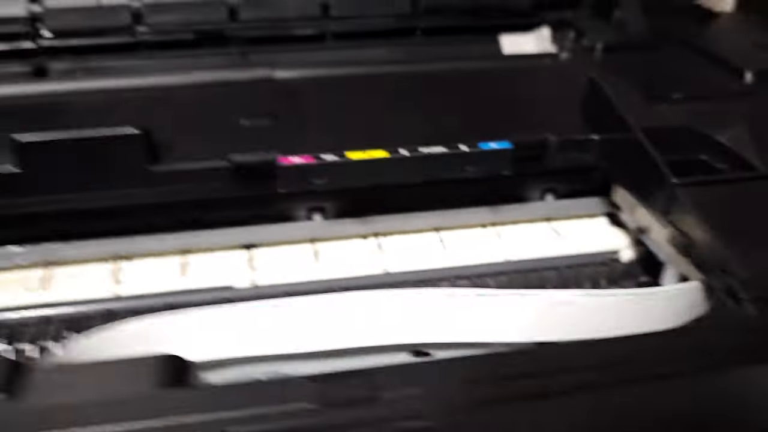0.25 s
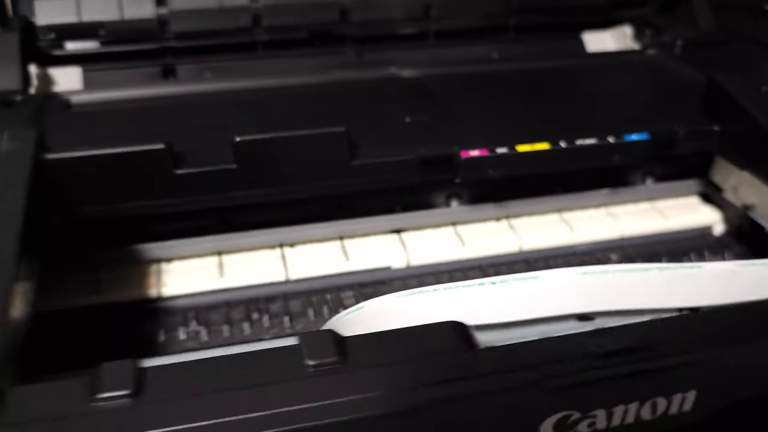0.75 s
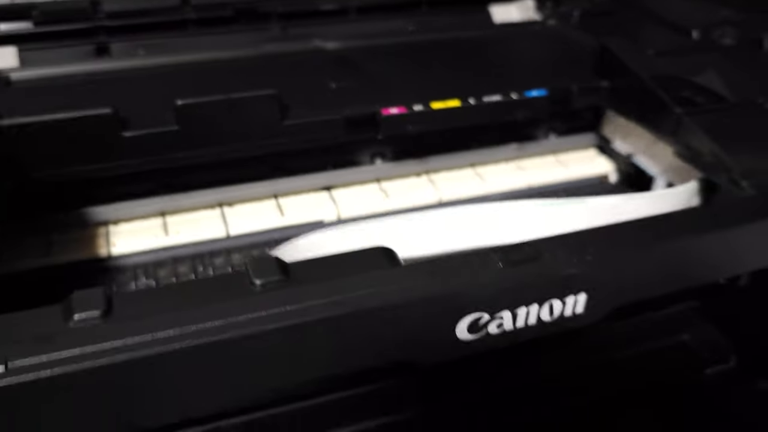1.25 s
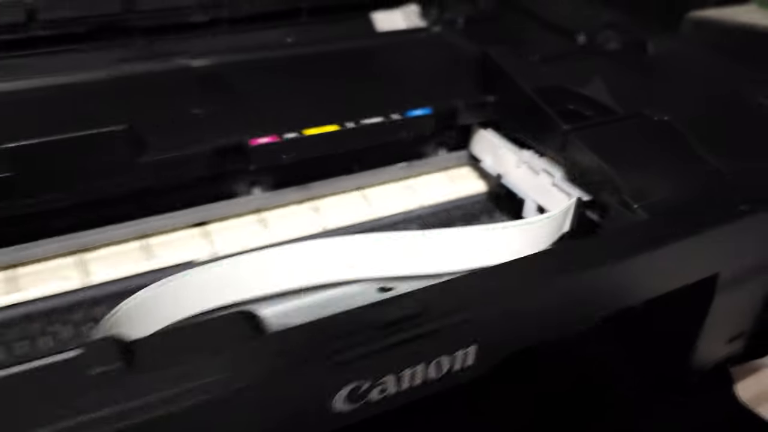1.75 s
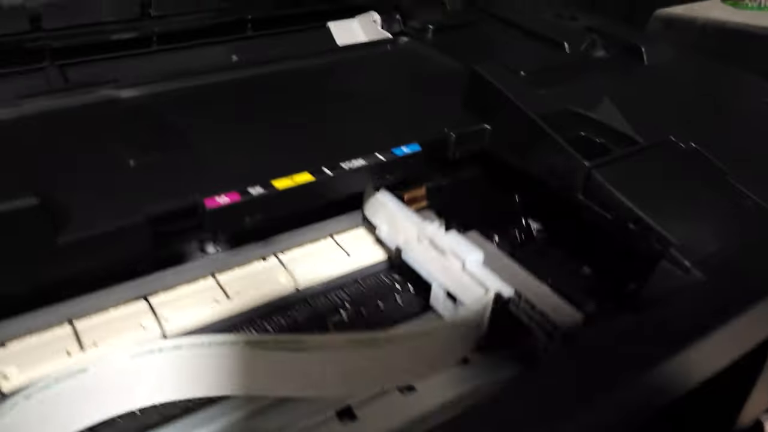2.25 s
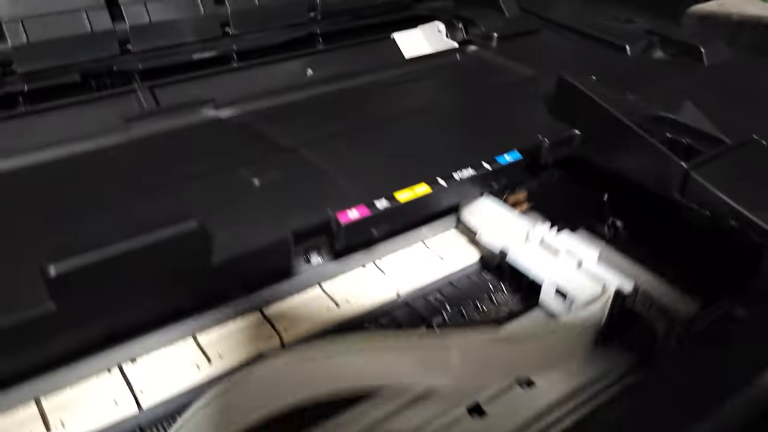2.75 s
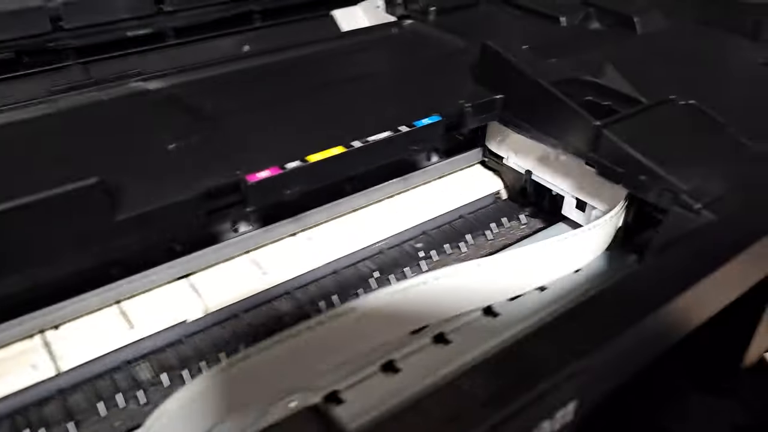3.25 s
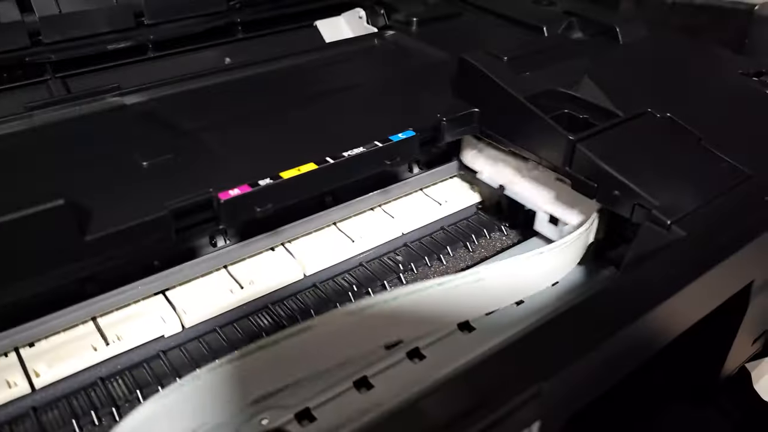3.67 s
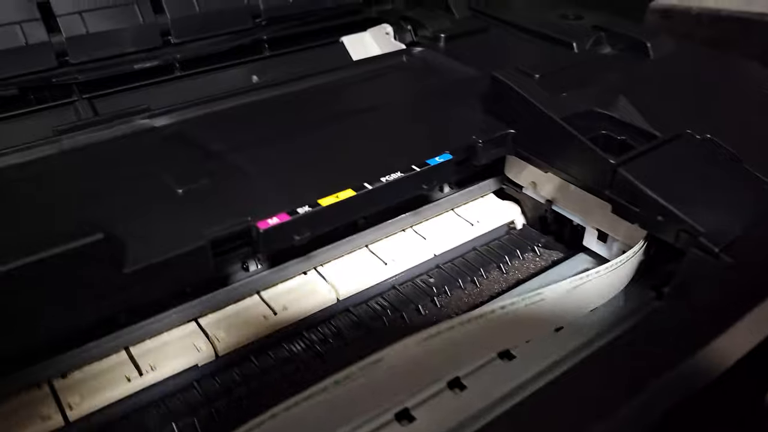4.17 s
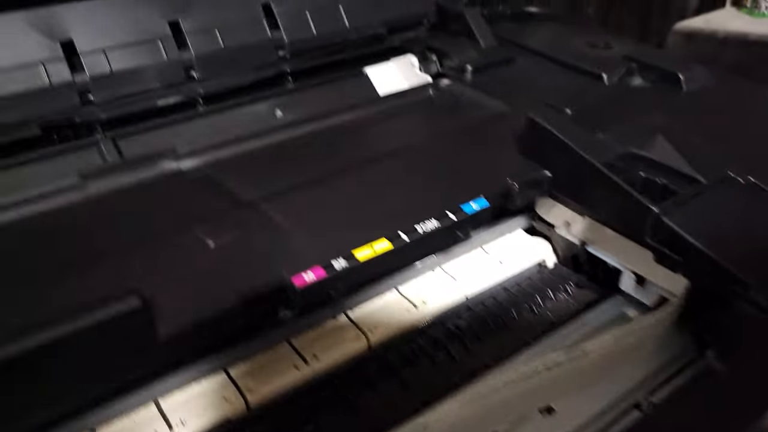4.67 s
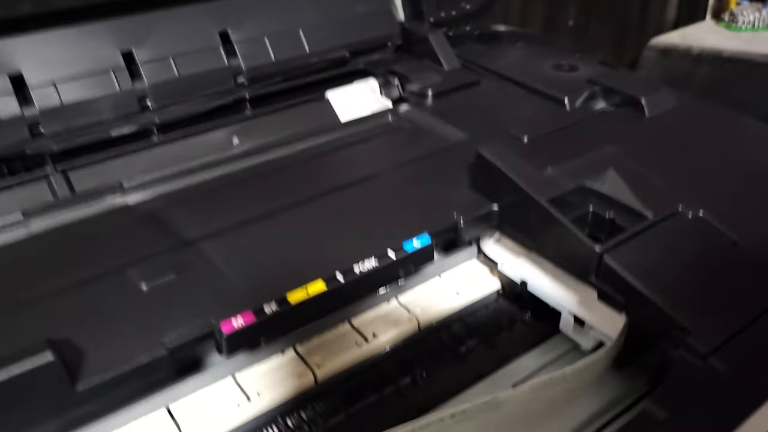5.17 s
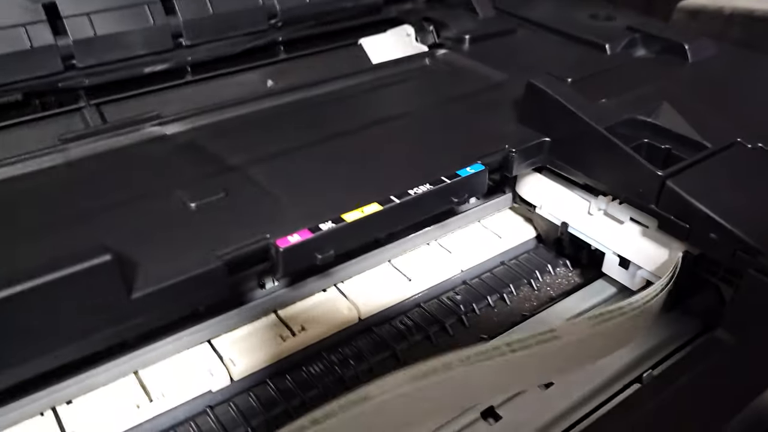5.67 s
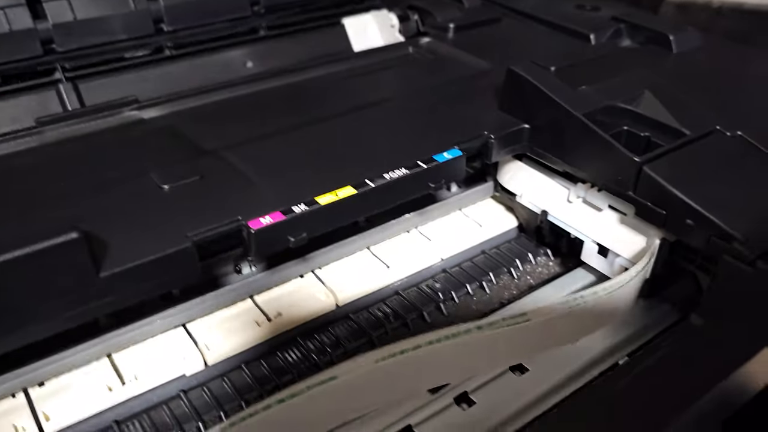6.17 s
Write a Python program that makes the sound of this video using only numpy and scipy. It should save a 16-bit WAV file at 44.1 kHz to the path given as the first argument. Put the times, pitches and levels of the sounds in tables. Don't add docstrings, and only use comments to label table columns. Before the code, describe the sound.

Close stereo view of an open inkjet printer in a small room. A low, rough motor hum and thin belt hiss run underneath. Plastic clicks and dull knocks come in uneven clusters, sparse at first, with a quieter stretch in the middle, then denser and louder. Latches tick, the cover rings briefly, and the carriage finally slams against its stop.

```python
import sys
import numpy as np
from scipy import signal
from scipy.fft import rfft, irfft, next_fast_len
from scipy.io import wavfile
from scipy.ndimage import uniform_filter1d, map_coordinates

SR = 44100
rng = np.random.default_rng(int(sys.argv[2]) if len(sys.argv) > 2 else 0)


def dump(signal):
    limited = np.clip(np.atleast_2d(signal).T, -1, 1)
    pcm = np.round(limited * 32767).astype(np.int16)
    wavfile.write(sys.argv[1], SR, pcm)


def gain_from_db(level_db):
    decades = np.asarray(level_db, float) / 20
    return 10 ** decades


N = 282284
TIME_S = np.arange(N) / SR

CLICKS = [(.2436, -35, -2.5, -4.5), (.338, -45, -10.5, -15), (.7147, -35, -12.5, -37),
          (1.271, -46.5, -3, -21), (1.366, -41.5, -14, -37), (1.4354, -52.5, -6, -40),
          (1.6347, -54.5, 5.5, -34), (1.6882, -43, 4.5, -17.5), (1.781, -50, 2, -16),
          (3.558, -46.5, -1, -11.5), (3.5933, -39.5, -3.5, -41), (3.801, -35.5, -3, -3),
          (3.8274, -39.5, -0.5, -7), (4.3253, -49, 7, -34), (5.2875, -46, 5, -18), (5.395, -47.5, -20, -3),
          (5.559, -66, -6, 10), (5.619, -54, 3, -16), (5.744, -59.5, 9.5, -2), (5.911, -57, -4, -8.5),
          (6.0705, -35.5, 0, -10), (6.0888, -46, 5.5, -28)]
TICKS = [(.1373, -45.5, 1.5, -24), (.8609, -57.5, 10.5, -9), (2.5371, -44.5, -7.5, -6),
         (2.578, -44.5, -10, -12), (3.641, -40.5, 4, -27), (3.6725, -52, 3, -19), (3.7018, -41.5, 3, -8),
         (4.1045, -24, -18, -19.5), (4.37, -33.5, -10, -35), (4.4224, -55.5, 5, -4.5),
         (4.9654, -50, -18, -18), (5.229, -39, 6.5, -28), (5.3776, -50.5, 1, -7), (5.4494, -53, 2, -10),
         (5.5114, -46.5, 4, 0), (5.586, -68, -6, 9), (5.84, -55, 14, -33), (6.1502, -27.5, 0.5, -6.5),
         (6.1664, -45.5, 6, 5), (5.497, -55, -1, -20), (5.535, -60, 1, -2), (6.2189, -32.5, -4, -18.5),
         (6.316, -50.5, -0.5, -23), (6.2155, -55, -10, 5)]
RATTLES = [(.1148, -53.5, 5, -5), (.2256, -36, -3.5, -2.5), (.261, -42, -13, -11), (.4315, -40, -2.5, -29),
           (1.4914, -38, -11.5, -37), (1.798, -46.5, -3, -7), (1.946, -47.5, -1, -25),
           (3.251, -48, 5.5, -17), (3.346, -33, -14, -8), (3.361, -38, -0.5, -7.5),
           (3.8486, -47.5, -18, -10), (4.8602, -44.5, -7.5, -22), (4.8828, -43.5, -2.5, -13.5),
           (4.918, -40.5, -0.5, -23.5), (5.9663, -58.5, 0, -12), (.29, -49, -15, -8),
           (6.176, -41.5, -8, -8), (6.26, -61, -5, -22)]
# [t/s, crack level/dB, shell knock re crack/dB, fizz re crack/dB, length/s]
SCRAPES = [(0.449, -42, -1.5, -14.5, 0.033), (0.553, -67, 14, -20, .012), (0.65, -52, -2, -28, 0.042),
           (0.683, -43, -0.5, -16, 0.015), (0.874, -68.5, 11.5, -6, 0.033), (1.188, -58, 5.5, -38, 0.028),
           (1.277, -50, -2, -16.5, 0.049), (1.541, -55, -4.5, -40, 0.032), (1.637, -66, 13, -25, 0.016),
           (3.323, -42.5, 4.5, -16, 0.039), (3.54, -44.5, -3, -20.5, 0.04), (3.71, -52, 2, -41, 0.029),
           (3.776, -45.5, 1.5, -19, 0.071), (3.999, -59.5, 2, -23, .039), (4.026, -51.5, -2.5, -32, 0.11),
           (4.109, -44.5, -1, -15.5, 0.03), (4.302, -49.5, -1, -43, 0.015), (4.34, -45, 2.5, -23, 0.019),
           (5.011, -61, 6.5, -29, 0.04), (5.109, -44.5, -1.5, -46, 0.021), (5.293, -62, -8, 1, 0.025),
           (6.223, -45, -12, -28, 0.02)]
# [f/Hz, width/Hz, level/dB]
LEVER_MODES = [(1470, 360, -4.5), (1850, 377, 2), (2140, 430, 1.5), (3260, 800, -4.5)]
# [f/Hz, width/Hz, level/dB]
CATCH_MODES = [(3520, 780, -5), (4200, 500, 0), (5050, 920, -2)]
# [f/Hz, width/Hz, level/dB]
SHELL_MODES = [(469.5, 64, -3.5), (541.4, 42, -2), (614, 52, -2), (725, 74, -2.5), (938, 133, -8),
               (1055, 82, -5), (1383, 183, -7.5)]
# [f/Hz, level/dB per Hz]
FIZZ_SPECTRUM = [(4500, -37), (6000, -1.5), (7400, 1.5), (8500, -5.5), (10200, -9.5), (12000, -12),
                 (15800, -15.5)]

# [t/s, peak level/dB, f/Hz]
THUDS = [(.139, -28, 157), (.228, -32, 150), (.856, -43, 128), (.888, -44, 174), (.99, -50.5, 169),
         (1.29, -40, 150), (1.788, -43, 102), (1.871, -40, 141.4), (2.541, -39, 194), (2.58, -42.5, 121),
         (3.259, -27.5, 165), (3.396, -47, 148), (3.55, -28.5, 126), (3.7, -38, 99.6), (3.858, -38, 150),
         (4.872, -27.5, 139), (4.918, -37.5, 165), (5.035, -47, 150), (5.291, -40, 151), (5.424, -40, 126),
         (5.458, -39, 139), (5.647, -40.5, 116), (5.76, -46, 150), (6.075, -36.5, 104), (6.148, -24.5, 104),
         (6.185, -37, 91), (6.31, -38.5, 93), (6.376, -31, 95)]
# [t/s, peak level/dB, f/Hz]
BUMPS = [(.224, -27, 305), (.244, -33.5, 265.4), (0.864, -41, 249), (1.284, -35, 289.7),
         (0.713, -49.5, 198), (1.2, -48.5, 205), (1.687, -38, 330.4), (3.15, -50, 232), (4.69, -44, 203.6),
         (4.76, -48, 215), (3.347, -20.5, 300), (3.639, -34, 315.3), (3.708, -32, 322), (3.805, -21.5, 298),
         (4.008, -41, 260), (4.099, -42, 293), (1.515, -52.5, 332), (3.265, -36, 380.4), (4.42, -33, 226),
         (4.21, -46, 270), (4.557, -45.5, 305), (5.23, -34, 362), (5.371, -40.5, 295), (5.511, -46, 367),
         (5.746, -30, 260), (5.841, -43, 280), (6.01, -35, 239.5), (6.068, -33.5, 294), (6.225, -38, 303.4),
         (6.24, -39.5, 300), (5.31, -46, 247), (6.361, -42, 347)]
# [f/Hz, width/Hz, level/dB]
FRAME_MODES = [(107.7, 33, -5), (150, 50, -0.5), (240, 51, -1.5), (304.7, 22, 1.5), (376, 142, -6)]

# [t/s, ring level/dB, crack level/dB, crack t60/s]
SLAM = [
    (6.3573, -29.5, -40, 0.076),
    (6.363, -17.5, -14, 0.06),
    (6.37, -26, -22, 0.06),
]
# [f/Hz, level/dB, t60/s]
STOP_MODES = [(544, 0, 0.055), (687, -2.5, .06), (913, 5.5, 0.035), (1090, 8.5, 0.05), (1289, 4.5, 0.05),
              (1837, 0, 0.055), (2185, 4.5, 0.054), (2700, -8, 0.04), (3200, -8, 0.07)]

# [t/s, peak level/dB, f/Hz]
PINGS = [(.454, -39.5, 544), (.478, -42, 537), (1.492, -37.5, 1450), (1.687, -40.5, 520),
         (3.255, -39.5, 718), (3.645, -29.5, 690), (3.712, -37, 647), (1.692, -36, 700),
         (4.327, -35.5, 726), (4.347, -37, 656), (5.23, -25.5, 602), (5.234, -25, 601.4), (5.746, -43, 400),
         (6.155, -34, 600), (4.13, -46, 640), (5.288, -31.5, 696), (5.746, -41, 625), (6.149, -23, 888)]
# [t/s, peak level/dB, f/Hz]
TAPS = [(0.142, -39, 590), (0.224, -36, 433), (0.574, -58, 510), (0.688, -37.5, 612), (0.861, -44, 436),
        (1.27, -45, 526), (1.288, -39, 443), (1.789, -42, 450), (2.55, -36, 550), (3.347, -31, 382),
        (3.558, -33, 455), (3.711, -38, 519), (3.805, -31, 389), (4.033, -38, 582), (4.106, -32, 697),
        (4.876, -32.5, 480), (4.917, -35, 770), (5.511, -42, 376), (5.841, -34, 600), (6.014, -42, 384),
        (6.074, -33, 428), (6.219, -35, 568)]
# [t/s, peak level/dB, f/Hz]
TINKS = [(0.2244, -39, 2220), (0.4304, -45, 1046), (0.7168, -31, 2320), (.722, -37, 1900),
         (1.497, -40, 2050), (1.372, -42, 2100), (1.3674, -37, 1420), (1.49, -32, 1380), (1.689, -39, 1470),
         (1.945, -47, 1090), (3.342, -38, 1420), (3.5942, -43, 2010), (3.8043, -33, 1380),
         (4.1066, -30, 1420), (4.3725, -37, 2310), (4.8614, -56, 1040), (4.9182, -34, 1110),
         (5.109, -44, 1360), (5.23, -28, 1045), (5.3951, -49, 1920), (5.5118, -37, 1260),
         (5.5116, -38, 1700), (5.842, -44, 1000), (6.0735, -39, 1080), (6.1507, -38, 1060),
         (6.2203, -25.5, 1067)]
# [t/s, peak level/dB, f/Hz]
CHINKS = [(0.2247, -30, 4250), (0.244, -23, 4900), (0.7143, -37, 2690), (.72, -38, 4000),
          (1.492, -41, 4200), (1.37, -43.5, 4300), (1.8, -44, 5200), (1.3668, -43, 3020),
          (1.493, -40, 2770), (1.781, -44, 3550), (2.5395, -40, 3940), (2.579, -47, 3350),
          (3.345, -31, 2980), (3.5954, -29.5, 3000), (3.6996, -42, 3330), (3.803, -31, 3000),
          (4.1067, -22, 3200), (4.371, -35, 2750), (4.8609, -45, 3360), (4.918, -37.5, 3840),
          (5.229, -41, 2900), (5.3767, -41, 3570), (5.3955, -39, 3940), (5.5109, -50, 5160),
          (6.073, -29, 2710), (6.1502, -24, 3860), (6.1654, -23.5, 4860)]

# [t/s, chassis hum level/dB]
LOAD = [(0, -54), (.46, -53.5), (.56, -61.5), (1.19, -57.5), (1.34, -52.5), (1.55, -69.5), (1.77, -47.5),
        (1.96, -56.5), (2.46, -58.5), (3.22, -57), (3.99, -60.5), (4.26, -61.5), (4.42, -52), (4.76, -55),
        (5.2, -61.5), (5.36, -54), (5.62, -54), (6.4, -51)]
# [t/s, belt hiss level/dB]
TRAVEL = [(0, -58.5), (.34, -55.5), (.46, -58.5), (.51, -74.5), (.75, -69), (1.64, -72.5), (1.72, -66),
          (2.25, -62), (3.24, -63), (3.44, -78), (3.62, -64), (3.85, -66), (3.99, -77), (4.54, -68.5),
          (5.24, -72), (5.31, -62), (5.56, -71.5), (6.4, -64.5)]
# [t/s, whirr gain/dB]
MESH = [(0, 3), (.6, 0), (4.35, -3.5), (4.5, -6.5), (4.9, -4), (5.6, 4.5), (6.4, 4.5)]
# [t/s, air gain/dB]
DRAUGHT = [(0, -2.5), (.2, -3), (.3, 3), (.5, 1), (1.7, 0), (2.3, 2.5), (3.3, -0.5), (4.2, -1.5),
           (4.6, -1.5), (5.3, -3.5), (5.7, -2), (6.4, -5)]
# [f/Hz, width/Hz, level/dB]
CHASSIS_MODES = [(89.3, 7.7, -3.5), (126, 15, 0), (192.8, 18, -0.5), (249, 16.7, -1.5), (300, 18.8, 0),
                 (362, 42, -9.5)]
# [f/Hz, width/Hz, level/dB]
GEAR_MODES = [(444, 13, 1), (553.3, 28.6, 0.5), (682, 40, -9.5), (805, 66, -9), (1070, 86, -8),
              (1560, 900, -14.5), (2100, 100, -11.5)]
# [f/Hz, level/dB per Hz]
BELT_SPECTRUM = [(880, -7), (1500, -7), (2000, -5.5), (2500, -9), (4020, -3.5), (6000, -9.5), (7800, -25),
                 (13200, -120)]
# [f/Hz, level/dB per Hz]
AIR_SPECTRUM = [(3530, -11.5), (6000, -9), (7370, -4), (9540, -10.5), (10600, -16.5), (12500, -9),
                (14000, -16), (15700, -13)]

# [t/s, length/s, level/dB]
WHINES = [
    (3.39, 0.15, -69),
    (3.863, 0.146, -68),
]
# [f/Hz, width/Hz, level/dB]
WINDING_MODES = [(4590, 340, 0), (12400, 350, -2), (13100, 300, -2), (14000, 300, -1), (14400, 500, -3)]

# [t/s, length/s, start f/Hz, end f/Hz, level/dB]
RUBS = [(0, 0.064, 3900, 4110, -50), (4.694, 0.1, 2000, 1940, -66), (.0, 0.24, 11700, 11900, -61.5),
        (.24, 0.21, 12300, 12100, -56), (.32, .04, 7400, 7400, -62), (0.368, 0.055, 8000, 7940, -64),
        (.455, .04, 7300, 7240, -58)]
# [t/s, length/s, start f/Hz, end f/Hz, level/dB]
CHIRPS = [(4.73, 0.051, 1960, 1410, -72), (4.785, 0.039, 1850, 1540, -79), (4.97, .175, 3920, 4200, -72),
          (5.135, .04, 4200, 3830, -70), (5.662, 0.045, 1050, 1070, -73), (5.712, 0.031, 1070, 1050, -65),
          (5.914, 0.048, 1070, 1070, -70.5)]
# [t/s, length/s, start f/Hz, end f/Hz, level/dB]
DRONES = [(3.86, .13, 312, 340, -69.5), (4.03, 0.115, 340, 310, -70), (4.14, .04, 262, 250, -60),
          (3.8, 0.043, 250, 254, -59), (4.6, 0.053, 560, 555, -78), (3.4, 0.128, 360, 305, -70.5)]

# [f/Hz, t60/s]
ROOM_T60 = [(150, 0.28), (1000, 0.17), (8000, 0.2)]
# [t/s, rumble level/dB]
SWAY = [(0.0, -72), (0.28, -52), (0.39, -78), (1.25, -69), (1.3, -59), (1.62, -80), (1.8, -58), (2.25, -78),
        (2.33, -62.5), (3.19, -82), (3.23, -69), (3.89, -64), (3.96, -79), (5.04, -66), (5.08, -79),
        (5.79, -69), (5.83, -81), (6.4, -69)]
# [f/Hz, level/dB per Hz]
RUMBLE_SPECTRUM = [(20, -32), (50, 12), (70, -3), (120, -44), (200, -120)]
# [f/Hz, left-right likeness]
LIKENESS = [(100, 0.99), (300, 0.92), (650, 0.79), (1000, 0.16), (1500, 0.0044)]
# [f/Hz, left minus right/dB]
LEFT_BALANCE = [(60, 0), (300, 2), (600, 2.2), (1000, 0.5), (2000, -1), (4000, 1), (8000, 1.5), (12000, 1)]


def clicks():
    s, db, knock_db, fizz_db, hold_s = np.transpose(SCRAPES)
    soft = contacts(s, db - 2.0, knock_db + 2.0, fizz_db + 4.0, t60_s=0 * s + 0.096,
                    snap_db=0.47 * fizz_db + 5.5, hold_s=hold_s, rise_s=0.0082, tick_db=-32)

    kinds = [(TICKS, 0.044), (CLICKS, 0.093), (RATTLES, 0.14)]
    rows = [(*row, t60_s) for table, t60_s in kinds for row in table]
    s, db, knock_db, fizz_db, t60_s = np.transpose(rows)
    snap_db = 5 + 0.57 * fizz_db
    hard = contacts(s, db, knock_db, fizz_db, t60_s, snap_db,
                    hold_s=0 * s + 0.0046, rise_s=0.00053, tick_db=-4.5)

    uneven_db = 3.1 * np.array([wobble(250), wobble(280), wobble(300), 0.38 * wobble(150)])
    crack, snap, fizz, knock = gain_from_db(uneven_db) * np.hypot(hard, soft)
    pushes = impulses(s + 0.00082, db + knock_db + 17.5, apart_s=0.00028)
    lever = driven(crack, resonant(LEVER_MODES, top_hz=3600))
    catch = driven(snap, resonant(CATCH_MODES, top_hz=6300))
    spray = driven(fizz, banded(FIZZ_SPECTRUM, depth_db=2.5, spacing_hz=222.4))
    shell = driven(knock, resonant(SHELL_MODES, top_hz=2430), pushes)
    return lever + catch + spray + shell


def contacts(s, db, knock_db, fizz_db, t60_s, snap_db, hold_s, rise_s, tick_db):
    def ticked(level_db, sharp_db=0):
        body = bursts(s, level_db - 8.5, hold_s, t60_s, rise_s)
        tick = bursts(s, level_db + tick_db + sharp_db, 0 * s, 0 * s + 0.011, 0.53 * rise_s)
        return np.hypot(body, tick)

    knock = bursts(s, db + knock_db - 1.5, 0.66 * hold_s, 1.03 * t60_s, rise_s)
    return np.array([ticked(db), ticked(db + snap_db), ticked(db + fizz_db + 3.0, sharp_db=2.5), knock])


def thuds():
    s, db, hz = np.transpose(THUDS + BUMPS)
    t60_s = np.maximum(0.079 - 0.0032 * (db + 24) - 0.032 * np.log2(hz / 200), 0.02)
    swing = swings(s, db - 1.5, hz, t60_s, rise_s=0.0041)
    shake = bursts(s, db - 7.5, 0 * s, 1.12 * t60_s, rise_s=0.0028)
    pushes = impulses(s + 0.0016, db + 16.5, apart_s=0.001)
    return swing + driven(shake, resonant(FRAME_MODES, top_hz=510), pushes)


def slam():
    ring = np.zeros((2, N + SR))
    t = np.arange(SR // 8) / SR
    rise = 1 - np.exp(-t / 0.0015)
    for s, db, _, _ in SLAM:
        for hz, mode_db, t60_s in STOP_MODES:
            apart_s = rng.uniform(0.00012, 0.00037) * min(hz / 950, 1) ** 2
            shift_s = apart_s * np.array([[0.5], [-0.5]]) + rng.uniform(0, 1 / hz)
            tone = np.sin(2 * np.pi * hz * (t + shift_s))
            ring[:, round(s * SR):][:, :len(t)] += gain_from_db(db + mode_db - 60 * t / t60_s) * rise * tone
    s, _, crack_db, t60_s = np.transpose(SLAM)
    envelope = bursts(s, crack_db - 0.5, 0 * s + 0.0031, t60_s, rise_s=0.00047)
    crack = driven(envelope, resonant([(1420, 2040, 28), (5670, 1700, 8.6), (7400, 850, 5.1)]))
    return ring[:, :N] + crack


def pings():
    s, db, hz = np.transpose(PINGS + [(s, db - 7.0, hz) for s, db, hz in TAPS])
    return swings(s, db + 3, hz, 36 / hz, rise_s=0.0023)


def tinks():
    rows = [(*r, 44) for r in TINKS] + [(*r, 36) for r in CHINKS]
    s, db, hz, cycles = np.transpose(rows)
    return np.array([swings(s + apart_s, db - 1, hz, cycles / hz, rise_s=0.00035)
                     for apart_s in (0, 0.00023)])


def drive():
    hum_db, mesh_db, belt_db, draught_db = [over_time(rows) for rows in (LOAD, MESH, TRAVEL, DRAUGHT)]
    whirr_db = -65 + mesh_db + 0.83 * (hum_db + 58)
    air_db = -69 + draught_db + 1.12 * (belt_db + 65)

    s, db, _ = np.transpose(THUDS + BUMPS)
    jolt = bursts(s, db, 0 * s + 0.062, 0 * s + 0.11, rise_s=0.019)
    hum_level = np.hypot(gain_from_db(hum_db), gain_from_db(-20) * jolt)
    whirr_level = np.hypot(gain_from_db(whirr_db), gain_from_db(-31.5) * jolt)
    belt_level = np.hypot(gain_from_db(belt_db), gain_from_db(-46) * jolt)

    load = np.tanh(wobble(29))
    hum_level = hum_level * gain_from_db(-0.5 + 2.2 * load + 1.1 * wobble(40))
    whirr_level = whirr_level * gain_from_db(0.5 * load + 0.35 * wobble(60))
    belt_level = belt_level * gain_from_db(0.7 * load + 0.76 * wobble(90))
    air_level = gain_from_db(air_db + 0.86 * wobble(25.05))

    hum = driven(hum_level, resonant(CHASSIS_MODES, top_hz=610))
    whirr = driven(whirr_level, resonant(GEAR_MODES, top_hz=2000))
    belt = driven(belt_level, banded(BELT_SPECTRUM, depth_db=1.8, spacing_hz=127.8))
    air = driven(air_level, banded(AIR_SPECTRUM, depth_db=1.5, spacing_hz=173.7))
    return hum + whirr + patchy(belt + air, depth_db=1.2)


def whine():
    s, length_s, db = np.transpose(WHINES)
    return driven(bursts(s, db, length_s, 0 * s + 0.06, rise_s=0.023), resonant(WINDING_MODES))


def squeaks():
    out = np.zeros((2, N + SR))
    t = np.arange(SR // 4) / SR
    rows = [(*r, 0.19) for r in RUBS] + [(*r, 0.048) for r in CHIRPS + DRONES]
    for s, length_s, start_hz, end_hz, db, share in rows:
        width_hz = share * start_hz
        phase = 2 * np.pi * (start_hz + (end_hz - start_hz) * t / length_s / 2) * t
        knots = rng.standard_normal((2, 1000))
        smear = np.array([np.interp(t * width_hz, np.arange(len(k)), k) for k in knots])
        steady = 200 / width_hz
        envelope = gain_from_db(db - 2.5) * np.exp(-2 * (2 * t / length_s - 1) ** 4)
        out[:, round(s * SR):][:, :len(t)] += envelope * (smear + steady) * np.sin(phase)
    return out[:, :N]


def room(x):
    step = SR // 3
    mono = np.pad(x.mean(axis=0), (0, -N % step)).reshape(-1, 1, step)
    hz, t, z = signal.stft(rng.standard_normal((len(mono), 2, step)), SR, nperseg=256)
    decay = gain_from_db(-60 * t / along(ROOM_T60, hz)[:, None])
    tails = signal.istft(z * decay, SR, nperseg=256)[1][..., :step]
    tails = tails / np.linalg.norm(tails[:, :1], axis=2, keepdims=True)
    wet = signal.fftconvolve(mono, tails, axes=2)
    out = np.zeros((2, N + 3 * step))
    for k, piece in enumerate(wet):
        out[:, k * step:][:, :piece.shape[1]] += piece
    return ports(out[:, :N], np.ones_like)


def rumble():
    return driven(gain_from_db(over_time(SWAY)), lambda hz: gain_from_db(along(RUMBLE_SPECTRUM, hz)))


def over_time(rows):
    return np.interp(TIME_S, *np.transpose(rows))


def along(points, hz):
    f, v = np.transpose(points)
    return np.interp(np.log(hz + 1), np.log(f + 1), v)


def wobble(rate_hz):
    return map_coordinates(rng.standard_normal(int(N * rate_hz / SR) + 4), [TIME_S * rate_hz])


def bursts(times_s, levels_db, holds_s, t60s_s, rise_s):
    power = np.zeros(N + SR)
    for s, db, hold_s, t60_s in zip(times_s, levels_db, holds_s, t60s_s):
        t = np.arange(0, min(hold_s + t60_s, 0.5), 1 / SR)
        fall_db = -60 * np.maximum(t - hold_s, 0) / t60_s
        power[round(s * SR):][:len(t)] += (gain_from_db(db + fall_db) * (1 - np.exp(-t / rise_s))) ** 2
    return np.sqrt(power[:N])


def impulses(times_s, levels_db, apart_s):
    out = np.zeros((2, N + SR))
    at = np.round(times_s * SR).astype(int)
    out[0, at] = gain_from_db(levels_db)
    out[1, at + round(apart_s * SR)] = gain_from_db(levels_db)
    return out[:, :N]


def swings(times_s, levels_db, pitches_hz, t60s_s, rise_s):
    out = np.zeros(N + SR)
    for s, db, hz, t60_s in zip(times_s, levels_db, pitches_hz, t60s_s):
        t = np.arange(0, min(t60_s, 0.5), 1 / SR)
        envelope = gain_from_db(db - 60 * t / t60_s) * (1 - np.exp(-t / rise_s))
        out[round(s * SR):][:len(t)] += envelope * np.sin(2 * np.pi * hz * t)
    return out[:N]


def resonant(modes, top_hz=20000):
    def response(f):
        total = 0
        for k, (hz, width_hz, db) in enumerate(modes):
            damping = 1j * f * width_hz
            total = total + (-1) ** k * gain_from_db(db) * damping / (hz * hz - f * f + damping)
        return total / (1 + 1j * f / top_hz) ** 2
    return response


def banded(spectrum, depth_db, spacing_hz):
    ripple = rng.standard_normal(1000)
    knots = np.arange(len(ripple))
    return lambda hz: gain_from_db(along(spectrum, hz) + depth_db * np.interp(hz / spacing_hz, knots, ripple))


def driven(envelope, response, blows=0):
    gain = np.sqrt(np.mean(np.abs(response(np.linspace(0, SR / 2, num=8192))) ** 2))
    return ports((envelope * rng.standard_normal((2, N)) + blows) / gain, response)


def patchy(x, depth_db):
    z = signal.stft(x, nperseg=512)[2]
    field = uniform_filter1d(rng.standard_normal(z.shape[1:]), size=7, axis=0)
    field = uniform_filter1d(field, size=16, axis=1)
    return signal.istft(z * gain_from_db(depth_db * field / field.std()), nperseg=512)[1][:, :N]


def filtered(x, response):
    m = next_fast_len(N + SR // 8)
    return irfft(rfft(x, m) * response(np.fft.rfftfreq(m, 1 / SR)), m)[..., :N]


def ports(pair, response):
    def mid_side(hz):
        turn = np.arccos(np.clip(along(LIKENESS, hz), -1, 1)) / 2
        return response(hz) * np.array([np.cos(turn), np.sin(turn)])

    mid, side = filtered(pair, mid_side)
    return np.array([mid + side, mid - side])


def scene():
    hits = clicks() + thuds() + slam() + pings() + tinks()
    sound = hits + drive() + whine() + squeaks() + gain_from_db(-6.0) * room(hits) + rumble()
    return filtered(sound, lambda hz: gain_from_db(np.outer([0.5, -0.5], along(LEFT_BALANCE, hz))))


def band_limit(x):
    return signal.sosfilt(signal.butter(12, 16470, fs=SR, output="sos"), x)


def record(dry):
    soft = dry / (1 + np.abs(dry / 0.8) ** 4) ** (1 / 4)
    mix = filtered(soft, lambda hz: np.clip((15950 - hz) / 350, 0, 1) ** 2)
    return band_limit(mix)


dry = scene()
out = record(dry)
dump(out)
```